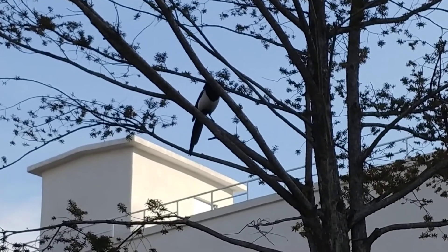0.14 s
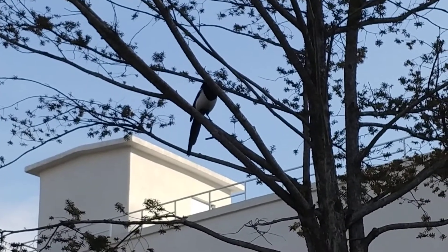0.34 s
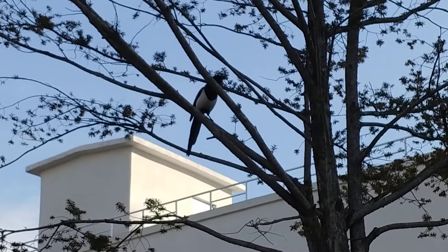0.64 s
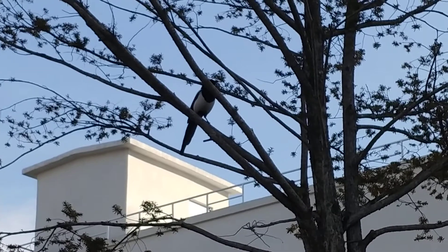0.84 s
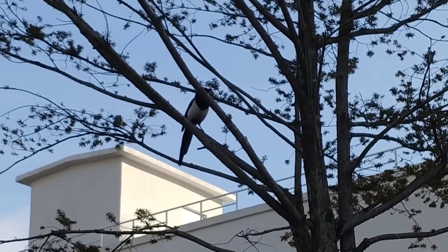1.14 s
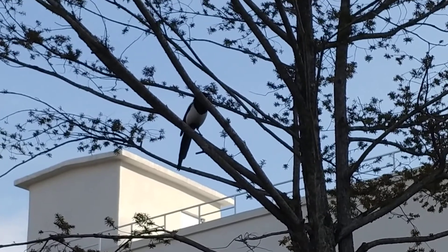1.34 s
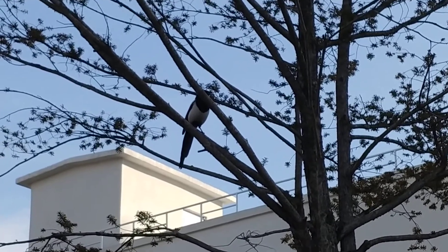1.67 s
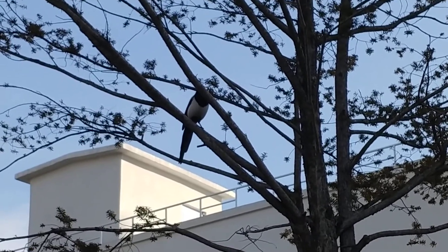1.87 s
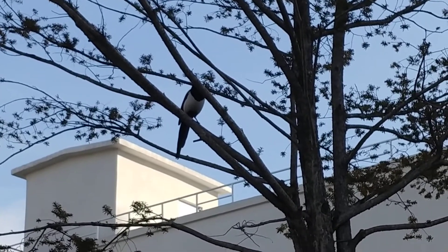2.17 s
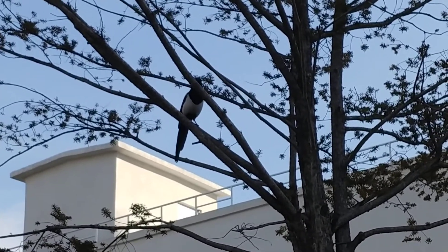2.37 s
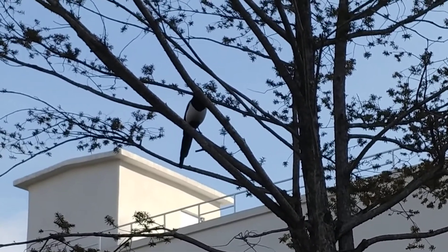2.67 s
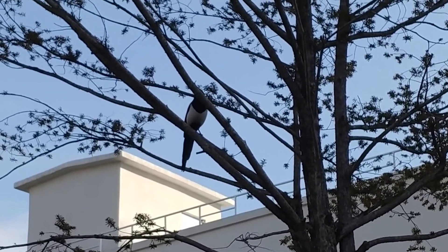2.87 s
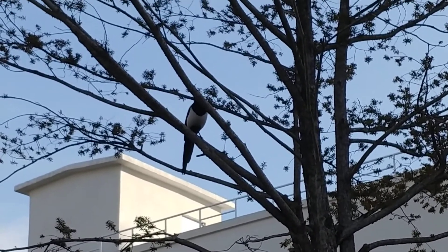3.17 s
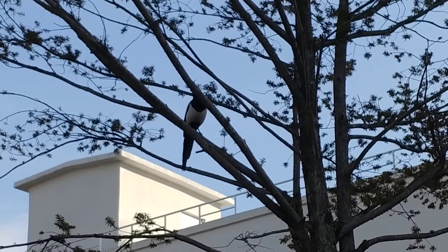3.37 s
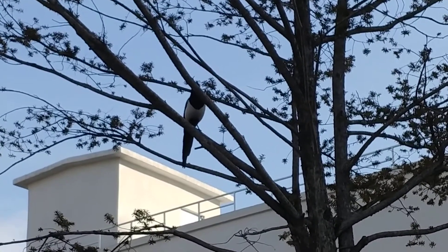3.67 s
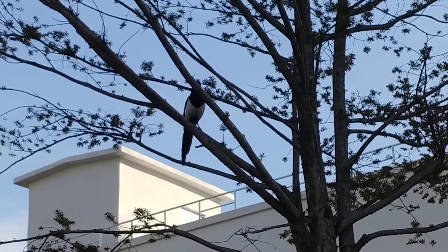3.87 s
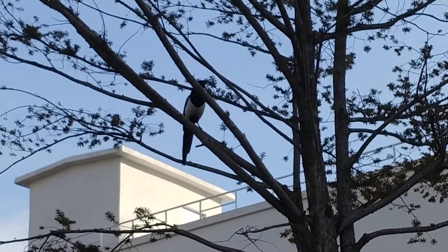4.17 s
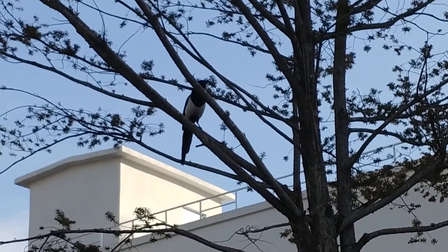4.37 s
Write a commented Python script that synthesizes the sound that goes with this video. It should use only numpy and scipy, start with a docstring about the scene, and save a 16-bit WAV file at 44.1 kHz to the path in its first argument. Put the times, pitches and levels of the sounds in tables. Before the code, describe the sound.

Outdoors beside a building, a low town rumble and drone run throughout, the drone strongest at first. A magpie gives one sharp, dry chak early and another well after, each led by a tiny squeak. A distant horn hoots faintly, with light taps, before the bird ends in a fast chatter of five raspy double notes. Walls echo the calls; the stereo handheld microphone is some distance away.

```python
"""A town rumbles and drones low, the drone louder at first, and something rustles faintly.
Then a magpie in a tree beside a building gives two single chaks and a chatter of five double notes.
A thin squeak leads into each chak and each clack: a wavering whistle, while the harsh notes are snaps
coloured by the throat. Close surfaces and walls throw the calls back.
A vehicle hoots far away and there are three light taps; all the noises are filtered chance."""
import sys
import numpy as np
from scipy import signal
from scipy.fft import rfft, irfft, next_fast_len
from scipy.io import wavfile
from scipy.ndimage import uniform_filter1d

SR = 44100
rng = np.random.default_rng(int(sys.argv[2]) if len(sys.argv) > 2 else 0)


def wav_out(sig):
    """Save sig, one row per channel (or a flat mono array), as 16-bit PCM at SR to the path in sys.argv[1]."""
    wavfile.write(sys.argv[1], SR, np.round(np.clip(np.atleast_2d(sig).T, -1, 1) * 32767).astype(np.int16))


N = 199287   # length in samples
TIME = np.arange(N) / SR   # seconds
SIZE = next_fast_len(N + SR)   # room for a second of tail
HZ = np.maximum(np.arange(SIZE // 2 + 1) * SR / SIZE, 1)


def from_db(db):
    """Turn decibels into a gain."""
    return 10 ** (np.asarray(db) / 20)


def rms_one(x):
    """Scale a sound to an rms (average strength) of 1."""
    return x / np.sqrt(np.mean(x ** 2) + 1e-20)


def at_hz(points):
    """Read a table over pitch at every frequency of the spectrum."""
    hz, value = np.transpose(points)
    return np.interp(np.log(HZ), np.log(hz), value)


def colour(x, points):
    """Filter with the given spectrum, so that nothing sounds before its cause (minimum phase)."""
    cepstrum = irfft(np.log(from_db(at_hz(points))), SIZE)
    # fold the backward half of the cepstrum onto the forward half
    cepstrum[1:SIZE // 2] *= 2
    cepstrum[SIZE // 2 + 1:] = 0
    response = np.exp(rfft(cepstrum))
    return irfft(rfft(x, SIZE) * response, SIZE)[..., :N]


def drift(rate):
    """Smooth chance of spread 1, changing about rate times a second."""
    smoothing = 1 / (1 + (HZ / rate) ** 2)
    return rms_one(irfft(rfft(rng.standard_normal(SIZE)) * smoothing, SIZE)[:N])


def resonance(x, hz, width_hz):
    """Ring at one pitch like a two-pole resonance, with gain 1 on top."""
    r = np.exp(-np.pi * width_hz / SR)
    feedback = [1, -2 * r * np.cos(2 * np.pi * hz / SR), r * r]
    return signal.lfilter(np.array([1, 0, -1]) * (1 - r * r) / 2, feedback, x)


def noise_band(hz, width_hz):
    """Noise around one pitch, with steep flanks; rms 1."""
    noise = rng.standard_normal(N)
    return rms_one(resonance(resonance(noise, hz, width_hz), hz, width_hz))


def delayed(x, seconds):
    """The same sound, later."""
    return irfft(rfft(x, SIZE) * np.exp(-2j * np.pi * HZ * seconds), SIZE)[..., :N]


def panned(x, pan_db):
    """Make the left louder than the right by pan_db."""
    return x * from_db(np.array([[pan_db], [-pan_db]]) / 2)


def swell(phase, rise, fall):
    """Rounded rise and fall while phase runs 0-1; each flank takes the given share."""
    nearest_end = np.minimum(phase / rise, (1 - phase) / fall)
    return np.sin(np.pi / 2 * np.clip(nearest_end, 0, 1))


def magpie():
    """Harsh notes and squeaks from one bird, heard across the yard."""
    notes, squeals = phrases()
    return yard(harsh_notes(notes) + squeaks(squeals)) * from_db(-6.5)


# Levels of the calls and squeaks are relative: all of them are turned down together above.
# The single chaks. Each row: start in seconds, level in dB, brightness in dB, gape of the bill 0-1.
SINGLE_CHAKS = [(0.702, -15.5, 0.5, 0.03), (2.453, -15, 0, 0.26)]
# The chatter; each call is a rasp and then a clack. Each row: start in seconds, wait for the clack
# in seconds, rasp level in dB, clack level in dB, brightness in dB, gape of the bill 0-1.
CHATTER_CALLS = [(3.653, .074, -24, -16.5, 1, .82), (3.8, 0.069, -21, -14.5, 3.5, .72),
                 (3.978, .068, -18, -13.5, 2, .1), (4.162, .069, -18.5, -14, 2, 0),
                 (4.344, .07, -19.5, -14.5, 0.5, 0.03)]
# The three kinds of harsh note: length in seconds, first and last snap rate in Hz (closed bill,
# before any roughness), roughness 0-1, treble boost at the start in dB (before brightness).
CHAK_NOTE = dict(length_s=.0365, first_hz=765, last_hz=443, roughness=.1, treble_db=4)
RASP_NOTE = dict(length_s=.055, first_hz=660.4, last_hz=499.7, roughness=.7, treble_db=-1.5)
CLACK_NOTE = dict(length_s=.0285, first_hz=721.2, last_hz=448.4, roughness=.44, treble_db=-0.5)
# A rising squeak leads into a chak, an arched one bridges rasp and clack: first, middle and last
# pitch in Hz and whistle level in dB (closed bill), octave in dB relative to the whistle,
# and the level in dB of a short band of treble noise just before the note.
SQUEAK_UP = dict(first_hz=4900, middle_hz=5550, last_hz=6050, whistle_db=-42, octave_db=-16, hiss_db=-42)
SQUEAK_ARCH = dict(first_hz=4440, middle_hz=4670, last_hz=4480, whistle_db=-36, octave_db=-16, hiss_db=-39.5)


def phrases(lead_s=.066, wait_s=.035, overlap_s=0.0074):
    """Time the notes, and the squeaks that start before a chak or inside a rasp and run into the next note."""
    notes, squeals = [], []   # notes: start, level, brightness, gape, kind; squeaks: start, end, gape, kind
    for start, level_db, brightness_db, gape in SINGLE_CHAKS:
        notes.append((start, level_db, brightness_db, gape, CHAK_NOTE))
        squeals.append((start - lead_s, start + overlap_s, gape, SQUEAK_UP))
    for start, wait, rasp_db, clack_db, brightness_db, gape in CHATTER_CALLS:
        clack_start = start + wait
        notes.append((start, rasp_db, brightness_db, gape, RASP_NOTE))
        notes.append((clack_start, clack_db, brightness_db, gape, CLACK_NOTE))
        squeals.append((start + wait_s, clack_start + overlap_s, gape, SQUEAK_ARCH))
    return notes, squeals


# A wide-open bill goes with a higher voice and a higher, louder squeak.
GAPE_PITCH_SHARE, GAPE_SQUEAK_SHARE, GAPE_SQUEAK_DB = .065, .04, 5


def harsh_notes(notes, jitter=.22, shimmer_db=5, rasp=1.0, bright_hz=3500, glide_curve=1.4, closing_db=6):
    """The syrinx snaps at a rate that falls ever faster; in rough notes the snaps are uneven and hiss."""
    pitch = np.full(N, 500.)
    rough, bright_db, gape, envelope = np.zeros((4, N))
    for start, level_db, brightness_db, opening, kind in notes:
        phase = np.clip((TIME - start) / kind["length_s"], 0, 1)
        on = TIME >= start
        glide = kind["first_hz"] + (kind["last_hz"] - kind["first_hz"]) * phase[on] ** glide_curve
        pitch[on] = glide * (1 + GAPE_PITCH_SHARE * opening)
        rough[on], gape[on] = np.clip([kind["roughness"], opening], 0, 1)
        # each note dulls as the membrane slackens
        bright_db[on] = kind["treble_db"] + brightness_db - closing_db * phase[on]
        envelope += from_db(level_db) * swell(phase, rise=0.29, fall=0.23)
    cycles = np.cumsum(pitch * np.exp(jitter * rough * drift(400))) / SR
    # one snap per whole cycle, of uneven strength in rough notes
    snaps = np.diff(np.floor(cycles), prepend=0) * from_db(shimmer_db * rough * drift(580))
    hiss = rng.standard_normal(N) * np.exp(-4 * (cycles % 1))   # a burst after each snap
    voice = throat(rms_one(snaps) + rasp * np.sqrt(rough) * rms_one(hiss), gape)
    voice /= np.sqrt(uniform_filter1d(voice ** 2, size=300) + 1e-9)   # steady air pressure evens the level
    treble = irfft(rfft(voice, SIZE) / (1 + (bright_hz / HZ) ** 8), SIZE)[:N]
    return (voice + (from_db(bright_db) - 1) * treble) * envelope


# How throat and bill colour the snaps. Each row: pitch in Hz (closed bill), level in dB.
THROAT_COLOUR = [(600, -41.5), (1080, -14), (1300, -16.5), (1650, -3), (2000, -5), (2300, 5), (2640, -4.5),
                 (2900, -13), (3650, -24.5), (4250, -16), (4800, -18.5), (5700, -29), (8300, -23.5),
                 (11500, -48)]


def throat(source, gape, open_shift=1.06):
    """A wide-open bill shortens the tube and lifts its resonances."""
    opened = [(hz * open_shift, db) for hz, db in THROAT_COLOUR]
    return (1 - gape) * colour(source, THROAT_COLOUR) + gape * colour(source, opened)


def squeaks(squeals, waver=0.042, noise_hz=8500, noise_width_hz=4200, noise_s=0.045):
    """A wavering whistle and its octave; a short band of treble noise swells just before the note."""
    pitch = np.full(N, 5000.)
    whistle_gain, octave_gain, noise_gain = np.zeros((3, N))
    for start, end, gape, kind in squeals:
        phase = (TIME - start) / (end - start)
        on = TIME >= start
        glide = np.interp(phase[on], [0, .5, 1], [kind["first_hz"], kind["middle_hz"], kind["last_hz"]])
        pitch[on] = glide * (1 + GAPE_SQUEAK_SHARE * gape)
        whistle_db = kind["whistle_db"] + GAPE_SQUEAK_DB * gape
        # octave and treble noise share one short swell
        short_swell = swell(1 + (TIME - end) / noise_s, rise=0.76, fall=0.17)
        whistle_gain += from_db(whistle_db) * swell(phase, rise=0.33, fall=0.15)
        octave_gain += from_db(whistle_db + kind["octave_db"]) * short_swell
        noise_gain += from_db(kind["hiss_db"]) * short_swell
    angle = 2 * np.pi * np.cumsum(pitch * (1 + waver * drift(1100))) / SR
    whistle = np.sqrt(2) * (whistle_gain * np.sin(angle) + octave_gain * np.sin(2 * angle))
    return whistle + noise_gain * noise_band(noise_hz, noise_width_hz)


def scatter(x, t60, build_s):
    """Countless small reflections build up and die by 60 dB in t60 seconds, different on each side."""
    t = TIME[:SR]
    response = rng.standard_normal((2, SR)) * from_db(-60 * t / t60) * (1 - np.exp(-t / build_s))
    return signal.fftconvolve(x[None], rms_one(response) / np.sqrt(SR), axes=1)[:, :N]


# Nearby surfaces, for the left and the right microphone.
# Each row: delay after the direct sound in milliseconds, level in dB relative to it.
CLOSE_LEFT = [(5.6, 2), (6.84, -22), (11.1, -3), (18.0, -6.5)]
CLOSE_RIGHT = [(5.27, -1.5), (17.3, -4.5), (23.0, -8)]
# Far walls. Each row: delay in seconds, level in dB, centre in Hz and width in Hz of the band sent back.
FAR_WALLS = [(0.107, -7.5, 2710, 795), (0.186, -16.5, 1810, 1750), (.187, -5.5, 4350, 800),
             (0.234, -18, 2700, 3000)]
# What the yard gives back late. Each row: pitch in Hz, level in dB before the tail is turned down.
TAIL_COLOUR = [(1200, 5), (2500, 6.5), (3400, 8), (4400, 13.5), (5500, 0.5), (9000, 3), (12000, 3)]


def yard(x, twigs_db=-13, tail_db=-16):
    """Add close reflections, echoes from the walls and a long tail to the direct sound."""
    left = x + sum(from_db(db) * delayed(x, ms / 1000) for ms, db in CLOSE_LEFT)
    right = x + sum(from_db(db) * delayed(x, ms / 1000) for ms, db in CLOSE_RIGHT)
    direct = np.array([left, delayed(right, .00045)])   # the right side hears it slightly later
    twigs = scatter(x, t60=.15, build_s=.005)
    # each wall returns mostly the band that the bill beams towards it
    echoes = np.zeros(N)
    for wait_s, db, hz, width_hz in FAR_WALLS:
        band = resonance(resonance(x, hz, width_hz), hz, width_hz)
        echoes += from_db(db) * delayed(band, wait_s)
    walls = scatter(echoes, t60=.04, build_s=.001)
    tail = scatter(colour(x, TAIL_COLOUR), t60=0.95, build_s=0.0033)
    return direct + from_db(twigs_db) * twigs + walls + from_db(tail_db) * tail


# The distant two-tone horn. Each row: pitch of a partial in Hz, relative level in dB.
HORN_TONES = [(528, -9), (883, -6), (1055, -1.5), (1324, -7.5), (1585, -8), (1760, -4)]


def far_horn(start_s=3.007, length_s=0.66, level_db=-45.5, wander=0.87):
    """One long hoot fades in and out; its partials waver on their way between the buildings."""
    partials = np.zeros(N)
    for hz, db in HORN_TONES:
        partials += from_db(db) * np.sin(2 * np.pi * hz * TIME + wander * drift(3.3))
    return from_db(level_db) * partials * swell((TIME - start_s) / length_s, rise=.55, fall=0.51)


# Light taps. Each row: start in seconds, relative level in dB.
TAP_BLOWS = [(3.213, -24.5), (3.521, -30.5), (4.123, -27.5)]
# Colour of the taps. Each row: pitch in Hz, level in dB.
TAP_SPECTRUM = [(100, 15.5), (300, 5.5), (800, -3), (2000, -4.5), (3500, -15.5), (8000, -70)]
# Faint rustles. Each row: start in seconds, length in seconds, level in dB before the grain.
RUSTLE_TIMES = [(0.046, 0.47, -79), (1.651, 0.21, -69), (1.807, 1, -75), (3.206, 0.57, -78.5)]
# Colour of the rustle. Each row: pitch in Hz, relative level in dB per Hz.
RUSTLE_SPECTRUM = [(4000, -15), (7500, 7.5), (9200, 9), (12000, -9)]


def small_sounds(stir_db=-82.5, tap_t60=0.015, grain_db=3.5, tap_pan_db=-7):
    """Taps are dull, quickly dying noise; grainy rustles rise quickly and die slowly over a constant stir."""
    blows = sum(from_db(db - 60 * np.abs(TIME - s) / tap_t60) * (TIME >= s) for s, db in TAP_BLOWS)
    taps = colour(3 * blows * rng.standard_normal(N), TAP_SPECTRUM)
    stir = from_db(stir_db)
    for start, length, db in RUSTLE_TIMES:
        stir = stir + from_db(db) * swell((TIME - start) / length, rise=0.13, fall=0.89)
    grain = from_db(grain_db * drift(220))
    return panned(taps, tap_pan_db) + stir * grain * diffuse(RUSTLE_SPECTRUM)


# How alike left and right are. Each row: pitch in Hz, likeness (1 same, 0 unrelated, below 0 opposed).
SIDE_LIKENESS = [(30, 0.98), (130, 0.75), (270, 0.84), (580, 0.64), (1200, -0.35), (2600, 0.02),
                 (12000, -0.12)]


def diffuse(points):
    """Stereo noise from all around: alike in the bass, nearly unrelated in the treble; middle rms 1."""
    mid, side = rfft(rng.standard_normal((2, SIZE)))
    alike = np.clip(at_hz(SIDE_LIKENESS), -.99, .99)
    both = np.sqrt(1 + alike) * mid + np.sqrt(1 - alike) * side * [[1], [-1]]
    x = irfft(both * from_db(at_hz(points)), SIZE)[:, :N]
    return x / np.std(x.mean(axis=0))


# Colours of the town's rumble and traffic. Each row: pitch in Hz, relative level in dB per Hz.
RUMBLE_COLOUR = [(22, -18), (38, 2), (52, -0.5), (66, 2), (95, -1), (150, -2.5), (205, -4.5), (290, -19),
                 (500, -25), (900, -57.5)]
TRAFFIC_COLOUR = [(150, -9.5), (380, -1), (650, -4), (1080, 5), (1400, 0.5), (2200, -0.5), (2900, -9.5),
                  (4000, -17.5), (5200, -28.5), (8500, -76), (12000, -64)]
RUMBLE_DB, TRAFFIC_DB = -39, -45   # before the passing vehicle
# Rumble and tyre wash swell once as a vehicle goes by.
PASS_START_S, PASS_LENGTH_S, PASS_DB = 2.88, 1.25, 1.3
# The drone starts louder by the extra and eases off to its usual level, which varies by chance.
DRONE_HZ, DRONE_DB, DRONE_EXTRA_DB, DRONE_EASE_S = 194.3, -51, 11, 1.4
HUM_HZ, HUM_DB = 68, -46.5   # middle of the waver and of the throb


def town(waver_hz=4, throb_db=2, drone_width_hz=80, drone_swing_db=2.5):
    """Low rumble with a noise-band drone, a wavering machine hum, and the wash of far tyres."""
    passing_db = PASS_DB * swell((TIME - PASS_START_S) / PASS_LENGTH_S, rise=0.18, fall=0.87)
    road = from_db(RUMBLE_DB) * diffuse(RUMBLE_COLOUR) + from_db(TRAFFIC_DB) * diffuse(TRAFFIC_COLOUR)
    extra_db = DRONE_EXTRA_DB * np.maximum(1 - TIME / DRONE_EASE_S, 0)
    drone_db = DRONE_DB + extra_db + drone_swing_db * drift(2.2)
    drone = from_db(drone_db) * noise_band(DRONE_HZ, drone_width_hz)
    hum = np.sqrt(2) * np.sin(2 * np.pi * np.cumsum(HUM_HZ + waver_hz * drift(8.1)) / SR)
    return from_db(passing_db) * road + drone + hum * from_db(HUM_DB + throb_db * drift(12))


# Brief swells in the rumble. Each row: start in seconds, length in seconds, pitch in Hz, level in dB.
RUMBLE_SWELLS = [(-.02, 0.1, 59.7, -27.5), (0.626, 0.1, 410, -45.5), (3.488, 0.22, 68, -33)]


def low_swells(width_share=0.33):
    """Now and then the rumble swells softly around one pitch: a short band of noise."""
    total = np.zeros(N)
    for start, length, hz, db in RUMBLE_SWELLS:
        envelope = swell((TIME - start) / length, rise=0.24, fall=0.59)
        total += from_db(db) * noise_band(hz, width_share * hz) * envelope
    return total


def scene():
    """The bird over the sounds of the town."""
    return magpie() + far_horn() + small_sounds() + town() + low_swells()


# The two microphone ports differ. Each row: pitch in Hz, left minus right in dB.
PORT_BALANCE = [(190, 0), (630, -1.5), (1140, -5.5), (1500, -5), (2100, -8.5), (3500, -12), (4250, -7),
                (6700, 1.5), (8500, -4.5), (12000, -2.5)]


def record(dry, left_bass_hz=85, notch_hz=6250, notch_width_hz=1700, notch_depth=0.81, cutoff_hz=12000):
    """The left port loses bass, both swallow a band in the treble; the top is cut."""
    left = signal.sosfilt(signal.butter(1, left_bass_hz, "high", fs=SR, output="sos"), dry[0])
    balance = from_db(at_hz(PORT_BALANCE) / 2 * [[1], [-1]])   # half the difference on each side
    x = irfft(rfft(np.array([left, dry[1]]), SIZE) * balance, SIZE)[:, :N]
    x = x - notch_depth * resonance(x, notch_hz, notch_width_hz)
    return signal.sosfilt(signal.ellip(10, .3, 80, cutoff_hz, fs=SR, output="sos"), x)


dry = scene()
out = record(dry)
wav_out(out)
```